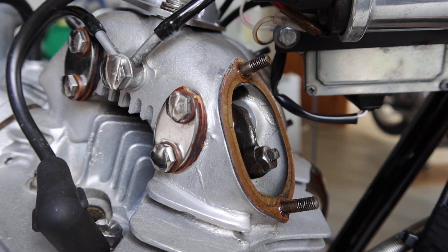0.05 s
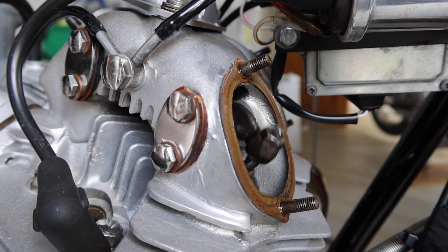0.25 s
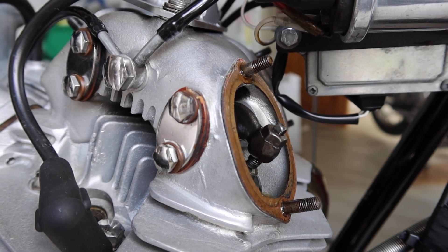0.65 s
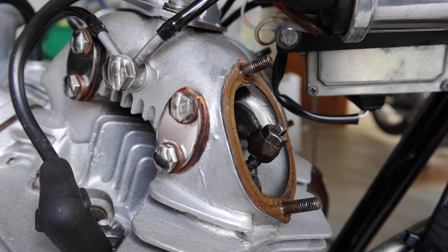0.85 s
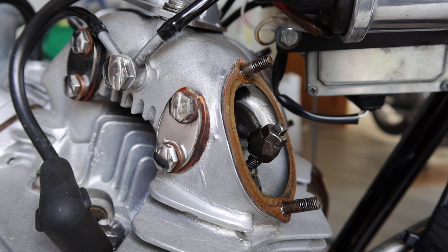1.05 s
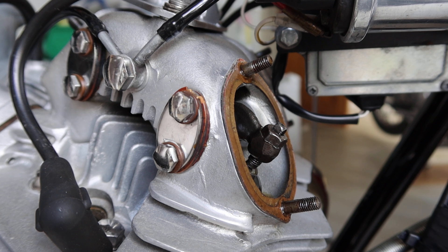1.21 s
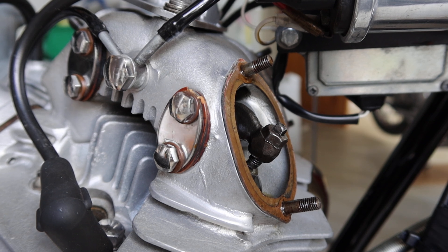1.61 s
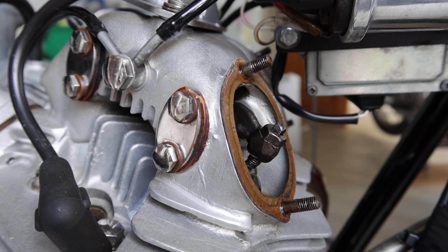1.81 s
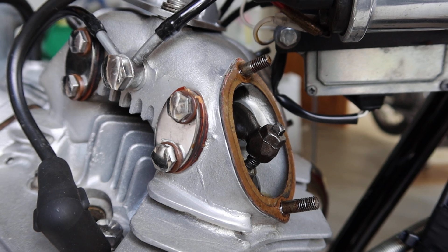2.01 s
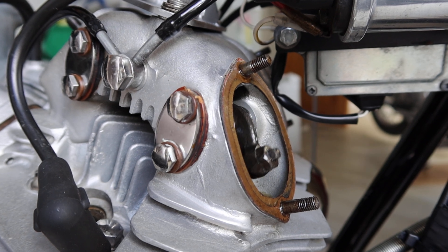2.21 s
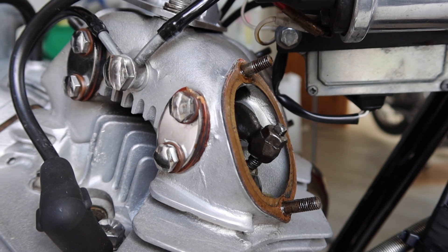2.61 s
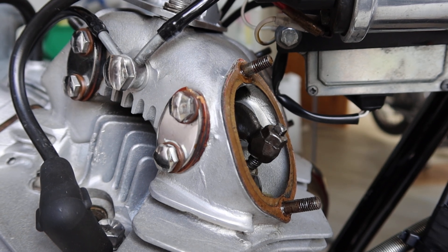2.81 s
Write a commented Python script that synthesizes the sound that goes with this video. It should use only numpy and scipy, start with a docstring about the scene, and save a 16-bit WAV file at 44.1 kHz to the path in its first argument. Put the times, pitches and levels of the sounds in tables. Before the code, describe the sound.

Dry engine parts rasp as they are turned by hand, with ratchet clicks in between.

```python
"""In a workshop, a small motorcycle engine with its valve cover off is turned over by hand.
Two turns give three rasping strokes each: dry parts scrape, ring the metal casting, squeal a little
and set off a low hum. Between the turns a ratchet clicks back and takes hold with a clunk.
Close walls thicken every sound."""
import sys
import numpy as np
from scipy import signal
from scipy.fft import rfft, irfft
from scipy.io import wavfile
from scipy.ndimage import uniform_filter1d

SR = 44100
rng = np.random.default_rng(int(sys.argv[2]) if len(sys.argv) > 2 else 0)


def store_pcm(level_fs):
    """Save levels as 16-bit WAV."""
    pcm = np.round(np.clip(level_fs, -1, 1) * 32767).astype(np.int16)
    wavfile.write(sys.argv[1], SR, np.atleast_2d(pcm).T)


N = 130095

# The broad tone of each sound. Each row: frequency in Hz, level in dB.
AIR_TONE = [(25, -25), (50, -14), (80, 0), (110, -3), (200, -6), (450, -8.5), (900, -17.5), (1700, -17.5),
            (3000, -22), (6000, -29.5), (10000, -39), (16000, -49)]
KNOCK_TONE = [(40, -40), (110, -5), (400, -3), (1500, -2.5), (2500, -4.5), (3200, -4.5), (3800, -8),
              (6000, -19.5), (8000, -41), (15000, -66)]
CLICK_TONE = [(60, -22), (250, -4), (600, 2), (900, -4), (1400, -3.5), (2100, -4), (3200, -1.5), (4400, -9),
              (5400, -6), (6400, -18), (10800, -26), (12300, -20), (15500, -39)]
SCRAPE_TONE = [(40, -21), (100, -14.5), (220, -9), (380, -5), (550, 1), (1000, -0.5), (1600, -2), (2700, 1),
               (4600, -1.5), (6200, -6), (7200, -15), (10000, -21), (16000, -38.5)]
# Stereo width. Each row: frequency in Hz, level of the left-right difference in dB.
AIR_WIDTH = [(40, -25), (110, -13.5), (220, -3.5), (500, -4.5), (1000, -0.5), (3000, -5.5), (14000, 1)]
ROOM_WIDTH = [(60, -31), (300, -25), (700, -13.5), (1100, -22.5), (2400, -12.5), (4400, -9), (8000, -0.5),
              (15000, 8.5)]
# The notes at which metal parts ring. Each row: pitch in Hz, width in Hz, boost in dB (below 0, a dip).
GEAR_NOTES = [(467, 46, 7), (880, 200, -2.5), (1125, 84, 7.5), (1590, 25, 14), (3230, 140, 4.5)]
WHEEL_NOTES = [(443, 46, 8), (1195, 220, 16), (1617, 88, 21.6), (1800, 130, 12), (2660, 150, 6.3),
               (4900, 230, 7.2)]
CASTING_NOTES = [(489, 44, 3.5), (718, 34, -5.5), (1011, 152, 6), (1326, 66, 7), (1567, 31, 9.5),
                 (1780, 100, 3.5), (1952, 200, 4), (2136, 100, -5), (2476, 260, 5), (3294, 184, 5.5),
                 (3510, 164, -9.5), (3760, 44, 6.5), (4150, 44, 5), (4700, 204, -8.5), (5035, 110, 6),
                 (6040, 270, 5)]
# Loose parts bumping. Each row: start in seconds, pitch in Hz, length in seconds, level in dB.
DULL_BUMPS = [(0.017, 420, 0.0043, -44), (0.109, 417, 0.0055, -37), (0.366, 74.6, 0.046, -38.5),
              (0.376, 256, 0.0034, -31), (0.569, 1003, 0.0062, -27), (1.7751, 684, 0.0098, -26.5),
              (1.788, 112, 0.016, -48), (1.798, 460, 0.012, -31), (2.56, 69, .025, -46)]
# Hums as a stroke loads the engine. Each row: start in seconds, swell length in seconds, level in dB.
LOAD_HUMS = [(.184, 0.079, -31), (.572, 0.077, -24.5), (2.347, 0.077, -25.5)]
# Metal hitting metal. Each row: start in seconds, level in dB, fade time in seconds, bass boost in dB,
# ringing pitch in Hz, its boost in dB.
METAL_KNOCKS = [(1.775, -34, 0.044, 4, 1990, 10), (1.783, -18.5, 0.046, 6.5, 2940, 9.5),
                (1.826, -30.5, 0.067, 10.5, 3160, 8), (2.859, -29, 0.12, -10, 1240, 4)]
# Ratchet clicks. Each row: start in seconds, level in dB, bass and treble boosts in dB,
# a frequency in Hz, its boost in dB, how fully the wheel rings from 0 to 1.
TOOTH_CLICKS = [(0.966, -33, 3, -7, 12300, -11, 0.37), (1.060, -30.5, 1.5, -7, 12240, -2, 0.76),
                (1.128, -29.5, 2.5, 4, 2850, 6.5, 0.7), (1.199, -28.5, -3, -2, 5540, -21, 0.82),
                (1.262, -25, -4, -0.5, 12500, 5, 0.94), (1.323, -28, 2.5, -0.5, 1600, 1.5, .7),
                (1.389, -30, -9.5, -1.5, 8800, 11, 0.72)]
# Squeals of dry parts. Each row: start and length in seconds, first and last pitch in Hz, level in dB,
# roughness from 0 to 1.
DRY_SQUEALS = [(0.284, 0.1, 2755, 2563, -17.5, .7), (0.393, 0.075, 3820, 3740, -20, .75),
               (0.559, 0.064, 960, 1107, -23.5, 0.95), (0.645, 0.033, 5860, 5970, -31, 0.4),
               (0.707, 0.045, 5790, 5800, -26.5, 0.9), (0.749, 0.048, 5680, 5504, -25.5, 0.4),
               (1.961, 0.13, 935, 1059, -31.5, 0.8), (2.225, 0.029, 2500, 2315, -22, 1),
               (2.352, 0.22, 519, 503.6, -28.5, 0.55), (2.403, 0.13, 2601, 2538, -23, 0.7),
               (2.409, 0.099, 5820, 6000, -29, .95)]
# Scraping strokes. Each row: start, rise, hold and fall in seconds, level in dB,
# bass and treble boosts in dB, a frequency in Hz, its boost in dB.
SCRAPE_STROKES = [(0.13, 0.19, 0.0066, 0.062, -16.5, 1.5, 10, 2800, 2.5),
                  (0.353, 0.067, 0.021, 0.1, -13.5, -3, 9.5, 3570, 5.5),
                  (0.528, 0.092, 0.042, 0.24, -18.5, 0.5, 5, 3650, -7.5),
                  (1.939, .19, 0.046, 0.16, -17.5, -2.5, 5, 4040, 3.5),
                  (2.283, 0.14, 0.065, 0.086, -17, 0, 6.5, 4032, -1.5),
                  (2.561, 0.034, 0.028, 0.091, -16, -1, 5, 3570, 1.5)]

EARLY_ECHO_S = 0.03
FADE = np.log(1000)  # a fade time is how long a sound takes to drop by 60 dB
TIME = np.arange(N) / SR


def gain(db):
    """Turn decibels into a multiplier."""
    return 10 ** (np.asarray(db) / 20)


def unit(x):
    """Scale a sound to an average power of 1."""
    return x / np.sqrt(np.mean(x ** 2))


def quickest_filter(log_gain):
    """Build the filter that answers soonest with these gains (minimum phase)."""
    cepstrum = irfft(log_gain)
    half = len(cepstrum) // 2
    cepstrum[1:half] *= 2
    cepstrum[half + 1:] = 0
    return irfft(np.exp(rfft(cepstrum)))


def shape(x, tone, notes=(), size=4096):
    """Filter a sound to give it a broad tone with ringing notes on top."""
    freqs = np.arange(size // 2 + 1) * SR / size
    hz, db = np.array(tone, float).T
    db = np.interp(np.log(freqs + 1), np.log(hz), db)
    for centre, width, boost in notes:
        db = db + boost / (1 + (2 * (freqs - centre) / width) ** 2)
    return signal.fftconvolve(x, quickest_filter(db * np.log(10) / 20))[:N]


def lows(x, hz):
    """Keep the part of a sound below a frequency."""
    return signal.sosfiltfilt(signal.butter(2, hz, fs=SR, output="sos"), x)


def wobble(hz):
    """Wander at random, up to about this many times a second."""
    return unit(lows(rng.standard_normal(N), hz))


def hit_level(x, db):
    """Set a hit's level as if its energy were spread over the time of the early echoes."""
    return x * gain(db) * np.sqrt(EARLY_ECHO_S * SR / np.sum(x ** 2))


def contact(start, fade_s, rise_s=0.0033, snap=0.27):
    """Two parts meet: one sharp snap, then a short chatter."""
    age = TIME - start
    chatter = rng.standard_normal(N) * np.clip(age / rise_s, 0, 1) * np.exp(-FADE * np.abs(age) / fade_s)
    chatter /= np.sqrt(np.sum(chatter ** 2))
    chatter[int(start * SR)] += snap
    return chatter


def stereo(middle, side, width):
    """Add the side sound on the left and subtract it on the right."""
    return middle + shape(side, width) * np.array([[1], [-1]])


def air():
    """The room has a quiet, low rush of its own."""
    middle, side = (gain(-47.5) * unit(shape(rng.standard_normal(N), AIR_TONE)) for _ in range(2))
    return stereo(middle, side, AIR_WIDTH)


def wall_echoes(x, fade_s, direct_db=-8.5, tail_db=-2, even_hz=45, size=32768):
    """Close walls follow a sound with a cluster of uneven echoes and a short tail."""
    t = np.arange(size) / SR
    echoes = rng.standard_normal(size)
    echoes *= np.where(t < EARLY_ECHO_S, gain(3.03 * rng.standard_normal(size)), gain(tail_db))
    echoes *= np.exp(-FADE * t / fade_s)
    echoes /= np.sqrt(np.sum(echoes ** 2))
    echoes[0] += gain(direct_db)
    # Even out the tone so that the room favours no pitch.
    power = uniform_filter1d(np.abs(rfft(echoes)) ** 2, int(even_hz * size / SR))
    echoes = signal.fftconvolve(echoes, quickest_filter(-np.log(power) / 2))[:size]
    return signal.fftconvolve(x, echoes)[:N]


def in_room(x, wide_db, fade_s):
    """Two different sets of echoes make a sound wide."""
    return stereo(wall_echoes(x, fade_s), gain(wide_db) * wall_echoes(x, fade_s), ROOM_WIDTH)


def split(x, direct_db):
    """Divide a sound into a share that comes straight to us and one that goes round the room."""
    direct = gain(direct_db)
    return direct * x, np.sqrt(1 - direct ** 2) * x


def bumps():
    """Parts take up their slack with soft bumps, a few vibrations long."""
    out = 0
    for start, hz, length, db in DULL_BUMPS:
        age = np.clip(TIME - start, 0, length)
        out += hit_level(np.sin(np.pi * age / length) * np.sin(2 * np.pi * hz * age), db)
    return out


def hums(hz=148.9, tail_db=-4.5, fade_s=0.48):
    """Under load, a low note swells in the engine and leaves a weaker ring."""
    out = 0
    for start, length, db in LOAD_HUMS:
        age = np.maximum(TIME - start, 0)
        progress = np.minimum(age / length, 1)
        swell = np.sin(np.pi * progress) ** 2
        tail = gain(tail_db) * progress * np.exp(-FADE * np.maximum(age - length / 2, 0) / fade_s)
        out += gain(db) * np.sqrt(2) * np.hypot(swell, tail) * np.sin(2 * np.pi * hz * age)
    return out


def knocks(ring_width_hz=340):
    """Metal parts meet and ring the gears."""
    out = 0
    for start, db, fade_s, bass_db, ring_hz, ring_db in METAL_KNOCKS:
        notes = [*GEAR_NOTES, (ring_hz, ring_width_hz, ring_db)]
        knock = shape(contact(start, fade_s), KNOCK_TONE, notes)
        out += hit_level(knock + (gain(bass_db) - 1) * lows(knock, hz=825), db)
    return out


def ratchet(boost_width_hz=1800):
    """A small catch drops over one tooth after another and rings the wheel, each time a bit differently."""
    out = 0
    for start, db, bass_db, treble_db, boost_hz, boost_db, ring in TOOTH_CLICKS:
        notes = [(hz, width, ring * boost) for hz, width, boost in WHEEL_NOTES]
        notes.append((boost_hz, boost_width_hz, boost_db))
        click = shape(contact(start, fade_s=0.067), CLICK_TONE, notes)
        bass, treble = lows(click, hz=1520), click - lows(click, hz=5560)
        out += hit_level(click + (gain(bass_db) - 1) * bass + (gain(treble_db) - 1) * treble, db)
    return out


def squeals():
    """Rubbing parts briefly catch on one sliding note, which a random flutter makes rough."""
    out = 0
    flutter = (wobble(hz=93) + 1j * wobble(hz=93)) / np.sqrt(2)
    for start, length, first_hz, last_hz, db, rough in DRY_SQUEALS:
        progress = np.clip((TIME - start) / length, 0, 1)
        hz = first_hz + (last_hz - first_hz) * progress
        pure = np.exp(2j * np.pi * np.cumsum(hz) / SR)
        note = np.sin(np.pi * progress) * np.real((1 - rough + rough * flutter) * pure)
        out += gain(db) * note * np.sqrt(length * SR / 2 / np.sum(note ** 2))
    return out


def scraping(snags_per_s=7000, spread_db=4.5, judder_db=2, boost_width_hz=640):
    """Tiny snags between dry parts ring the casting as each stroke speeds up, holds and slows."""
    snags = (rng.random(N) < snags_per_s / SR) * rng.choice([-1, 1], N)
    snags = snags * gain(spread_db * np.minimum(rng.standard_normal(N), 2.6))
    snags *= gain(judder_db * wobble(hz=116))
    out = 0
    for start, rise, hold, fall, db, bass_db, treble_db, boost_hz, boost_db in SCRAPE_STROKES:
        rasp = unit(shape(snags, SCRAPE_TONE, [*CASTING_NOTES, (boost_hz, boost_width_hz, boost_db)]))
        bass, treble = lows(rasp, hz=1030), rasp - lows(rasp, hz=6120)
        middle = rasp - bass - treble
        end = start + rise + hold + fall
        ramp = np.clip(np.minimum((TIME - start) / rise, (end - TIME) / fall), 0, 1)
        speed = np.sin(np.pi / 2 * ramp) ** 2
        # Treble grows most steeply with speed, so faster sounds brighter.
        bass = gain(bass_db) * bass * speed ** 0.45
        treble = gain(treble_db) * treble * speed ** 2.14
        out += gain(db) * (bass + middle * speed + treble)
    return out


def scene():
    """Place the engine and the ratchet in the room, over the quiet air."""
    background = air()
    bump_direct, bump_room = split(bumps(), direct_db=-6)
    squeal_direct, squeal_room = split(squeals(), direct_db=-1.5)
    slightly_left = gain([[0.1], [-0.1]])
    hits = slightly_left * (bump_direct + in_room(bump_room + knocks(), wide_db=2, fade_s=0.26))
    strokes = squeal_direct + in_room(scraping() + squeal_room, wide_db=-1.5, fade_s=0.24)
    clicks = in_room(ratchet(), wide_db=2, fade_s=0.2)
    return background + hums() + hits + clicks + strokes


def record(dry, top_hz=15700):
    """Clip the sound at full scale and cut the highest treble."""
    return signal.sosfilt(signal.ellip(8, .2, 70, top_hz, fs=SR, output="sos"), np.clip(dry, -1, 1))


dry = scene()
out = record(dry)
store_pcm(out)
```